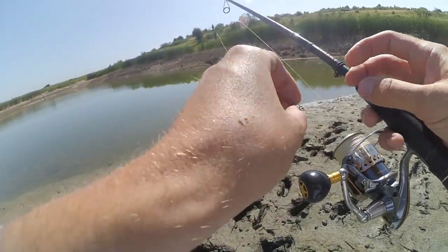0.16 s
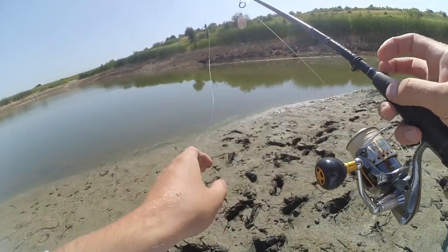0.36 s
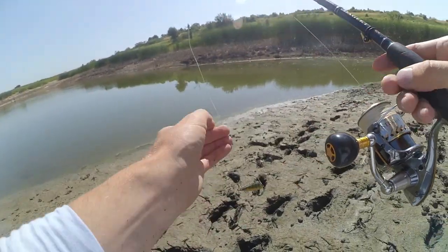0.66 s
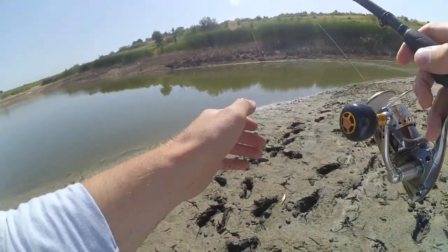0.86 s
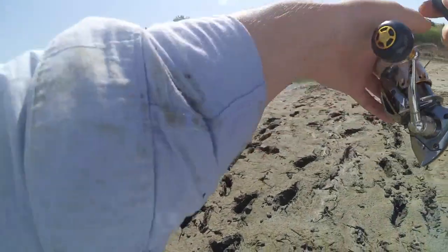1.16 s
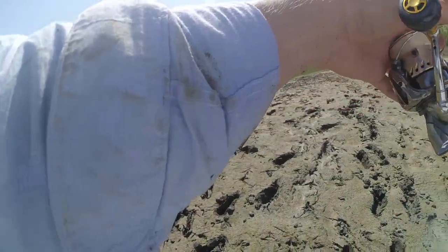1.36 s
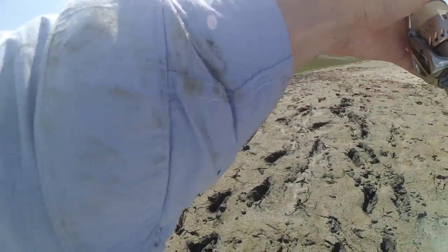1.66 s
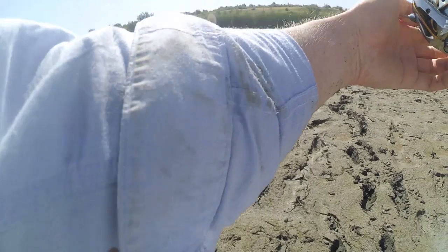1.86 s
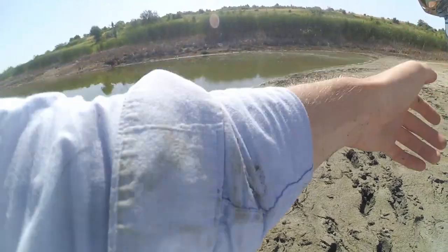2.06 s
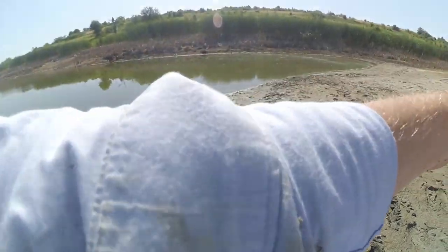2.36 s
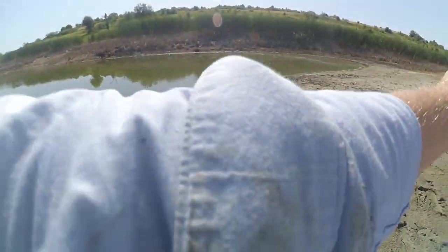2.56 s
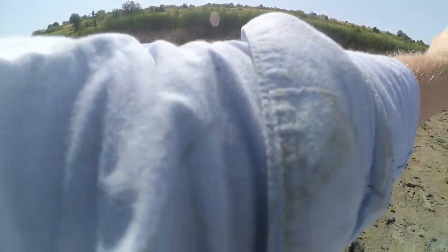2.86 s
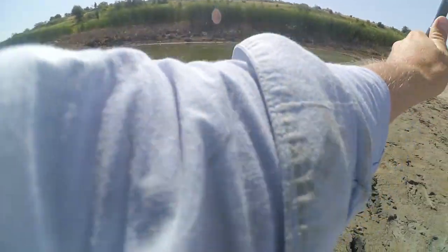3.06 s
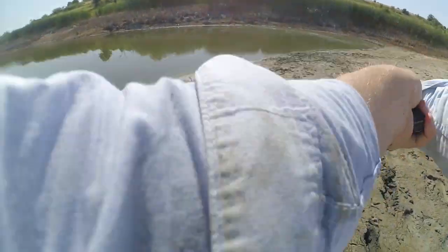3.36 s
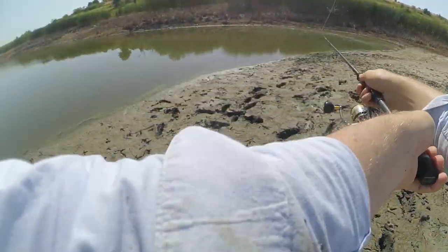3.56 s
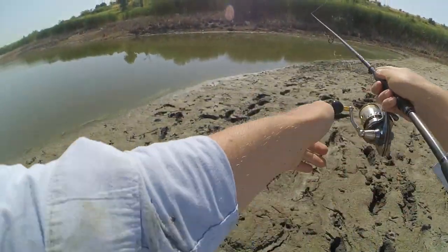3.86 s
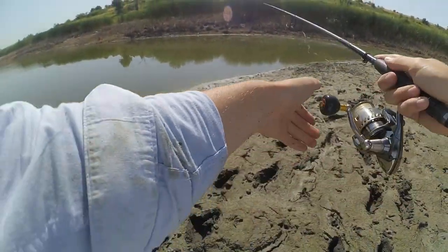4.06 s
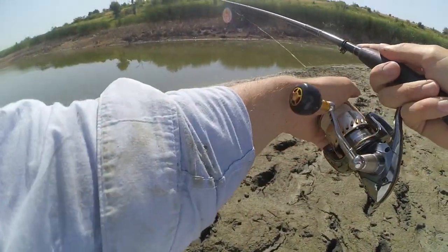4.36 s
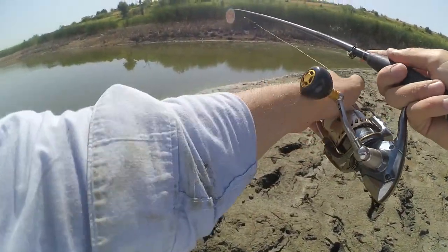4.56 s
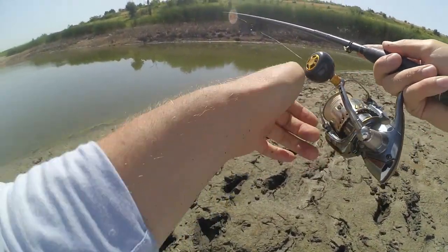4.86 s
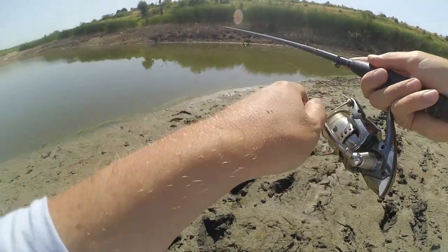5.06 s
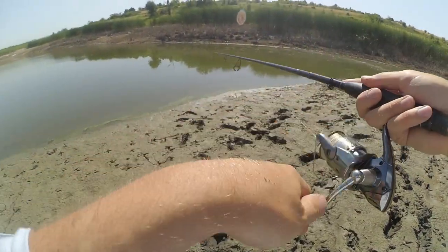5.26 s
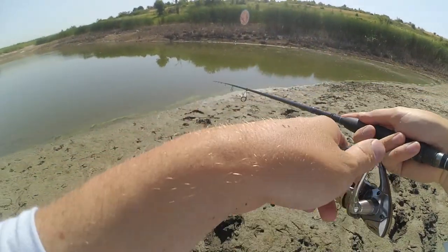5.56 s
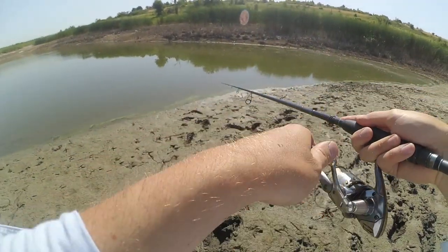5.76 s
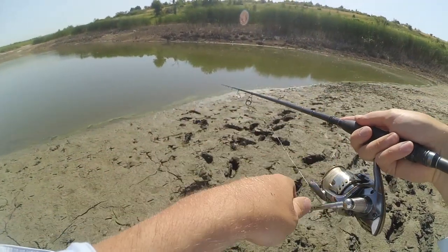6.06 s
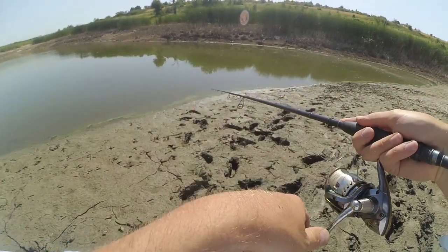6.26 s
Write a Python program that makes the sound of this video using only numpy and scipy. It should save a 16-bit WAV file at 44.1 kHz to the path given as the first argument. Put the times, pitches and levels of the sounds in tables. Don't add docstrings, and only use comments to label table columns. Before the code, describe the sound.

Outdoors by a quiet pond, an angler's shirt rustles and knocks against a sealed camera on the chest. Thin metal pings come as the reel wire opens, rubbing thickens, and a quick swish marks the cast. Cloth settles with dull taps; then the bail clacks shut with tiny bounces, and reel ticks continue over faint hiss.

```python
import sys
import numpy as np
from scipy import signal
from scipy.fft import rfft, irfft
from scipy.io import wavfile
from scipy.ndimage import uniform_filter1d

SR = 44100
rng = np.random.default_rng(int(sys.argv[2]) if len(sys.argv) > 2 else 0)


def transcribe(u):
    v = np.clip(np.atleast_2d(u).T, -1, 1)
    q = np.round(v * 32767).astype(np.int16)
    wavfile.write(sys.argv[1], SR, q)


def natural_amplitude(level_db):
    exponent = np.asarray(level_db, float) / 20
    return 10 ** exponent


N = 282856
TIME_S = np.arange(N) / SR

# frequency in Hz, density in dB per Hz.
HOUSING_RESPONSE = [(35, -24), (60, -4), (201, -3), (390, -10), (524, -5.5), (1040, -9), (1680, -27),
                    (2110, -15.5), (2840, -15.5), (3560, -26), (4900, -24.5), (5750, -34), (10200, -40),
                    (13100, -47.5), (14000, -53.5)]
# frequency in Hz, width in Hz, level in dB (unused).
SHELL_MODES = [(1039, 310, 0), (1520, 210, -8), (2140, 88, -2), (2846, 59, -6), (3310, 140, -10),
               (3870, 380, -13), (4400, 8.1, -14), (4920, 160, -13)]

# peak in seconds, rise in seconds, fall in seconds, level in dB, brightness in dB.
READYING_STROKES = [(.712, 0.095, 0.067, -55, -4.5), (.88, 0.19, 0.082, -65, -1.5),
                    (1.07, 0.14, 0.088, -58, -3.5), (1.18, 0.12, 0.13, -49, -4),
                    (1.29, 0.078, 0.085, -55.5, -4), (1.47, 0.16, 0.56, -58.5, -11.5),
                    (1.66, 0.51, .09, -56.5, -13), (1.84, 0.13, 0.15, -57.5, -3.5),
                    (2.07, 0.24, 0.12, -60.5, -4), (2.284, 0.067, 0.033, -61, -4.5),
                    (2.4, 0.13, 0.096, -60, -2.5), (2.51, 0.084, .07, -49.5, -4),
                    (2.57, 0.043, .07, -51.5, -3), (2.635, 0.085, .05, -48, -3),
                    (2.71, .07, 0.056, -50.5, -2.5), (2.79, .08, 0.13, -56.5, -3),
                    (2.88, 0.093, 0.75, -58, -1.5)]
# peak in seconds, rise in seconds, fall in seconds, level in dB, brightness in dB.
CASTING_STROKES = [
    (3.1, 0.21, 0.11, -53, -3),
    (3.186, 0.055, 0.068, -40.5, -5),
    (3.214, 0.045, 0.03, -34.5, -1.5),
    (3.29, 0.066, .06, -53, -13),
    (3.389, 0.16, 0.036, -50, -3),
    (3.481, 0.091, 0.42, -53.5, -6),
    (3.65, .2, 0.26, -60, -18),
    (3.82, 0.26, 0.15, -55.5, -5.5),
]
# peak in seconds, rise in seconds, fall in seconds, level in dB, brightness in dB.
REELING_STROKES = [
    (4.3, 0.49, 0.7, -72, -3.5),
    (4.87, 0.18, 0.2, -65, -4.5),
    (5.0, 0.21, 0.32, -62, -6),
    (5.29, 0.23, 0.11, -62, -11),
    (5.42, 0.18, .1, -70, -2),
    (5.75, 0.28, 0.15, -67, -11),
]
STROKE_DROP_DB, STROKE_SHAPE = 15.5, 1.19
REST_CAVITY_DB, REST_SHELL_DB, REST_HUM_DB, REST_LEAK_DB = -75, -78.5, -71.5, -82
HUM_DB, HUM_SLOPE, LEAK_DB, LEAK_SLOPE = -58.5, 1, -69, 0.83

# start in seconds, hum in dB, cavity over hum in dB.
CHEST_BUMPS = [(.485, -52.5, -1), (0.502, -40, -3), (0.962, -50.5, -3.5), (1.345, -46, -8),
               (1.401, -49, -9), (1.743, -42.5, -13), (1.796, -44.5, -6.5), (1.804, -51.5, 1),
               (1.895, -43.5, -9.5), (1.907, -49.5, -6), (2.061, -50, 0), (2.15, -48.5, -3),
               (2.896, -52, -6), (3.475, -43.5, -6), (3.826, -41.5, -7), (5.125, -43, -9),
               (5.95, -46, -10.5)]
# start in seconds, peak in dB, hardness in dB.
CREASE_SNAPS = [(.708, -44, -9), (.671, -57, 5), (.808, -53, 0), (1.145, -41, 3), (1.219, -41.5, -4),
                (1.287, -42.5, -0.5), (1.297, -43, -0.5), (1.7, -52, 4), (1.905, -58, -14), (2.016, -50, 5),
                (2.046, -37.5, -9), (2.061, -47, -6), (2.146, -53, -21), (2.224, -56.5, 9),
                (2.278, -48, -3), (2.349, -51, 2), (2.438, -43, -9), (2.493, -39, -3), (2.552, -56, -7),
                (2.595, -43, -4), (2.896, -53, 6), (2.972, -43.5, -7), (3.404, -42.5, -13),
                (3.649, -45.5, -7), (3.696, -49, -10), (3.741, -40.5, -10), (3.778, -52.5, 8.5),
                (4.999, -48, -4), (5.26, -51, -2), (5.754, -50.5, -8)]
JUDDER_START_S, JUDDER_PERIOD_S, JUDDER_COUNT = .7405, .0326, 6
JUDDER_DB, JUDDER_CAVITY_DB = -43, -9
BUMP_SHELL_DB, SNAP_HUM_DB = -13, -13
BUMP_THUD_DB, SNAP_THUD_DB = -1, -14
THUD_HZ, THUD_T60_S = 570, 0.025

# frequency in Hz, level in dB, t60 in seconds.
REEL_MODES = [(1560, 0, .011), (3600, -2, .007), (4500, -6, .006), (5500, -6, .006)]
# start in seconds, peak in dB, frame ring in dB, treble in dB, rattle length in seconds.
BAIL_HITS = [
    (4.582, -59, -64, -64, .0015),
    (4.614, -46, -58, -44, 0.00094),
    (4.6453, -52, -56, -58, 0.0015),
    (4.6475, -35.5, -45.5, -47.5, 0.0019),
    (4.654, -52, -70, -61, 0.00063),
    (4.661, -58, -64, -67, 0.0041),
    (4.671, -59, -70, -65, .0026),
    (4.742, -63, -71, -78, .002),
]
BAIL_HZ = 3700
# start in seconds, peak in dB.
WIRE_PINGS = [
    (1.8307, -47),
    (1.852, -48.5),
    (1.88, -53),
    (1.895, -55),
]
PING_HZ, PING_FRAME_DB, PING_TREBLE_DB, PING_RATTLE_S = 3450, -63, -8, .002
# start in seconds, peak in dB, ring in Hz, frame ring in dB.
REEL_TICKS = [(.432, -62, 3503, -76), (0.448, -62, 3100, -74), (.902, -52, 4900, -73),
              (1.682, -54, 2600, -74), (1.925, -54, 2060, -72), (4.084, -59, 2680, -70),
              (4.256, -49, 2240, -65), (4.267, -55, 2630, -77), (4.3122, -54, 2070, -77),
              (4.4518, -59, 2880, -64), (4.841, -56, 2960, -76), (4.996, -51, 4960, -66),
              (5.075, -54, 2140, -61), (5.102, -51, 2100, -51), (5.2609, -49.5, 2170, -61),
              (5.353, -58, 2860, -73), (5.4071, -55.5, 3920, -68), (5.749, -53, 2080, -68),
              (5.949, -56.5, 3900, -72)]
TICK_TREBLE_DB, TICK_RATTLE_S = -70, 0.0029
# start in seconds, peak in dB, ring in Hz, treble in dB, rattle length in seconds.
LINE_SLAPS = [
    (3.475, -41.5, 3700, -54.5, 0.00094),
]
SLAP_FRAME_DB = -70
# peak in seconds, rise in seconds, fall in seconds, level in dB, brightness in dB.
THUMB_SLIDES = [
    (4.47, .04, 0.11, -69.5, -5),
    (4.22, 0.055, 0.045, -78, -12),
]

# start in seconds, signed size, slow ring in Hz, t60 in seconds, knock in dB.
BODY_THUMPS = [(0.246, -0.011, 22, 0.87, -31.5), (0.487, -0.0065, 15.4, 1, -48),
               (.71, -0.017, 19, 0.2, -46), (0.807, 0.016, 25, 0.19, -32), (0.858, 0.0087, 36, 0.42, -53),
               (1.075, 0.015, 20, 0.26, -48), (1.494, -0.03, 21, 0.14, -55),
               (1.662, -0.024, 27, 0.15, -54.5), (2.041, -0.0095, 30, 0.4, -44),
               (2.27, -0.017, 25.6, 0.19, -48), (2.648, -0.0088, 25.7, 0.48, -58),
               (2.869, -0.011, 33, 0.15, -46.5), (3.186, 0.066, 14.4, 0.77, -30),
               (3.319, 0.03, 21.4, 0.34, -73), (3.385, -0.098, 16, 0.15, -40),
               (4.078, 0.011, 17, 0.12, -46), (4.155, -0.016, 88, 0.072, -50),
               (4.392, 0.009, 21.4, 0.53, -34.5), (4.846, 0.014, 15.4, 0.32, -47),
               (5.07, -0.018, 20.4, 0.12, -50), (5.0, 0.0091, 28, .3, -50),
               (5.586, -0.0104, 24.3, 0.63, -34), (5.812, 0.003, 30, 0.21, -45),
               (6.162, -0.0069, 24, 0.67, -33.5)]
# time in seconds, level in dB.
BODY_EFFORT = [(0.0, -54), (0.12, -68), (0.27, -55), (0.36, -67), (0.5, -50), (0.57, -66), (0.84, -44),
               (0.91, -55), (1.73, -50.5), (1.82, -55.5), (2.25, -54), (2.48, -61), (2.68, -54),
               (3.14, -67), (3.19, -39.5), (3.71, -57.5), (4.68, -57), (6.41, -62)]
SWAY_DB, SWAY_SLOPE, SWAY_WALK_DB, SWAY_TOP_DB, FLUTTER_DB = -48, 0.42, 6, -44, 1.5
# peak in seconds, rise in seconds, fall in seconds, level in dB, brightness in dB.
STRAP_STRAINS = [(.98, 0.068, 0.048, -61, 2), (1.25, 0.11, 0.15, -52.5, -10),
                 (1.4, 0.14, 0.12, -53.5, -9.5), (1.62, 0.15, 0.075, -64.5, 4),
                 (2.03, 0.075, 0.054, -56, -5), (2.15, 0.072, 0.096, -63, 3), (2.9, .06, .06, -55, -8.5),
                 (3.09, 0.093, 0.053, -58, -10), (3.2, 0.052, 0.053, -52.5, 0),
                 (3.5, 0.078, 0.1026, -54.5, -6), (3.8, .15, 0.11, -54.5, -3), (5.0, 0.22, .15, -58, -9),
                 (5.62, 0.052, 0.17, -61, -7)]

# frequency in Hz, width in Hz, level in dB.
CIRCUIT_MODES = [(2940, 340, 3), (4200, 200, 7), (6780, 470, -4)]
# start in seconds, length in seconds, level in dB.
CIRCUIT_CHIRRS = [
    (.095, 0.037, -75),
    (0.327, 0.025, -71),
    (4.122, .04, -75),
    (5.625, 0.051, -71.5),
    (5.928, .04, -73),
    (6.254, 0.043, -73.5),
]
BEAT_START_S, BEAT_PERIOD_S = .0415, .06
# frequency in Hz, density in dB per Hz.
HISS_SPECTRUM = [(35, -31.5), (60, -6), (277, -15), (356, -17), (993, -26), (1920, -29.5), (3560, -29),
                 (4370, -28), (6300, -36.5), (7060, -34.5), (7900, -34.5), (13100, -35), (14000, -41)]
HISS_DB = -72.5
CONVERTER_OFFSET = np.array([[-.00012], [.0005]])


def level(x, db=0):
    return x * natural_amplitude(db) / np.sqrt(np.mean(x ** 2))


def peak(x, db):
    return natural_amplitude(db) * x / np.abs(x).max()


def noise(count=N):
    return rng.standard_normal(count)


def band(x, lo_hz, hi_hz, order=4):
    sos = signal.butter(order, [lo_hz, min(hi_hz, .45 * SR)], "band", fs=SR, output="sos")
    return signal.sosfilt(sos, x)


def colour(x, points, peaks=(), lift_db=6, size=4096):
    f_hz = np.maximum(np.arange(size // 2 + 1) * SR / size, 1)
    points_hz, points_db = np.transpose(points)
    gain_db = np.interp(np.log(f_hz), np.log(points_hz), points_db)
    for hz, width_hz, _ in peaks:
        gain_db = gain_db + lift_db / (1 + (2 * (f_hz - hz) / width_hz) ** 2)
    cepstrum = irfft(gain_db * np.log(10) / 20)
    cepstrum[1:size // 2] *= 2
    cepstrum[size // 2 + 1:] = 0
    impulse = irfft(np.exp(rfft(cepstrum)))
    return signal.fftconvolve(x, impulse)[:len(x)]


def walk(rate_hz):
    hold = int(SR / rate_hz)
    steps = np.repeat(noise(N // hold + 1), hold)
    return 0.82 * uniform_filter1d(uniform_filter1d(steps, hold), hold)[:N]


def curves(table):
    s, *columns = np.transpose(table)
    return [np.interp(TIME_S, s, column) for column in columns]


def ring(t, hz, t60_s):
    return np.sin(2 * np.pi * hz * t) * np.exp(-np.log(1000) * t / t60_s)


def excite(force, mode):
    return signal.fftconvolve(force, mode)[:len(force)]


def add(out, s, sound):
    i = int(s * SR)
    out[i:i + len(sound)] += sound[:len(out) - i]


def strokes(table):
    plain, bright = 1e-12, 1e-12
    for s, rise_s, fall_s, db, bright_db in table:
        away = np.where(TIME_S < s, (s - TIME_S) / rise_s, (TIME_S - s) / fall_s)
        drop_db = np.minimum(STROKE_DROP_DB * away ** STROKE_SHAPE, 80)
        power = natural_amplitude(db - drop_db) ** 2
        plain = plain + power
        bright = bright + power * natural_amplitude(bright_db) ** 2
    return 10 * np.log10(plain), 10 * np.log10(bright)


def housing(force):
    x = colour(force, HOUSING_RESPONSE, SHELL_MODES + [(545, 99, 0)], lift_db=5)
    hum = band(x, 60, 267, order=2)
    cavity = band(x, 624, 1530)
    shell = band(x, 1520, 4550, order=3)
    leak = band(x, 6180, 20000, order=3)
    return hum, cavity, shell, leak


def cloth():
    sizes_db = np.minimum(4.9 * rng.exponential(size=N), 12)
    slips = (rng.random(N) < 1200 / SR) * noise() * natural_amplitude(sizes_db)
    flicker = natural_amplitude(0.19 * walk(45) + 2.8 * walk(140))
    force = flicker * (level(noise()) + level(slips, -2.2))
    hum, cavity, shell, leak = (level(part) for part in housing(force))
    plain_db, bright_db = strokes(READYING_STROKES + CASTING_STROKES + REELING_STROKES)
    hum_db = HUM_DB + HUM_SLOPE * (plain_db + 55)
    leak_db = LEAK_DB + LEAK_SLOPE * (bright_db + 55)
    regions = [(cavity, plain_db, REST_CAVITY_DB), (shell, bright_db, REST_SHELL_DB),
               (hum, hum_db, REST_HUM_DB), (leak, leak_db, REST_LEAK_DB)]
    out = np.zeros(N)
    for part, db, rest_db in regions:
        out += np.hypot(natural_amplitude(db), natural_amplitude(rest_db)) * natural_amplitude(0.96 * walk(25) - 1.5) * part
    return out


def taps():
    out, t = np.zeros(N), TIME_S[:2600]
    judder = [(JUDDER_START_S + k * JUDDER_PERIOD_S, JUDDER_DB, JUDDER_CAVITY_DB) for k in range(JUDDER_COUNT)]
    contacts = [(s, db + over_db, db + BUMP_SHELL_DB, db, BUMP_THUD_DB) for s, db, over_db in CHEST_BUMPS + judder]
    contacts += [(s, db, db + hard_db, db + SNAP_HUM_DB, SNAP_THUD_DB) for s, db, hard_db in CREASE_SNAPS]
    for s, cavity_db, shell_db, hum_db, thud_db in contacts:
        grit = noise(len(t))
        scuff = np.exp(-t / 0.00047) * (0.66 + grit)
        knock = (np.exp(-t / 0.00062) + 0.2 * np.exp(-t / 0.01)) * (0.52 + grit)
        push = signal.lfilter([1], [1, -np.exp(-1 / (0.00036 * SR))], knock)
        hum, cavity, _, _ = housing(push)
        shell = housing(scuff)[2]
        thud = band(excite(push, ring(t, THUD_HZ, THUD_T60_S)), 240, 900, order=1)
        add(out, s, peak(hum, hum_db + 0.5) + peak(thud, cavity_db + thud_db)
            + peak(cavity, cavity_db) + peak(shell, shell_db + 1.5))
    return out


def reel(table, t60_s, body, crack_hz):
    out, t = np.zeros(N), TIME_S[:1800]
    frame_hz, _, frame_t60_s = REEL_MODES[0]
    frame_mode = ring(t, frame_hz, 0.97 * frame_t60_s)
    body_modes = body * sum(natural_amplitude(db) * ring(t, hz, decay_s) for hz, db, decay_s in REEL_MODES[1:])
    for s, db, hz, frame_db, treble_db, length_s in table:
        decay = np.exp(-t / max(length_s, .0003))
        rattle = noise(len(t)) * decay * (1 - np.exp(-t / 0.00033))
        part = band(excite(rattle, ring(t, hz, t60_s) + body_modes), 2040, 4400, order=1)
        frame = band(excite(rattle, frame_mode), 1400, 1870, order=1)
        crack = band(rattle, *crack_hz, order=2)
        add(out, s, peak(part, db) + peak(frame, frame_db + 3.0) + peak(crack, treble_db + 7.0))
    return out


def metal():
    bail = [(s, db, BAIL_HZ, *rest) for s, db, *rest in BAIL_HITS]
    pings = [(s, db, PING_HZ, PING_FRAME_DB, db + PING_TREBLE_DB, PING_RATTLE_S) for s, db in WIRE_PINGS]
    ticks = [(*row, TICK_TREBLE_DB, TICK_RATTLE_S) for row in REEL_TICKS]
    ticks += [(s, db, hz, SLAP_FRAME_DB, treble_db, length_s) for s, db, hz, treble_db, length_s in LINE_SLAPS]
    out = reel(bail, 0.0082, 0.29, (4600, 11000))
    out += reel(pings, 0.011, 0.063, (5000, 13500))
    return out + reel(ticks, 0.0048, 0.12, (5000, 12000))


def thumb():
    drag = natural_amplitude(3.0 * walk(90)) * noise()
    frame_db, wire_db = strokes(THUMB_SLIDES)
    frame = level(band(drag, 1170, 1500, order=2))
    wire = level(band(drag, 3000, 4200, order=2))
    return natural_amplitude(frame_db) * frame + natural_amplitude(wire_db) * wire


def mount():
    effort_db, = curves(BODY_EFFORT)
    sway = level(band(noise(), 8.76, 23.4, order=2), -3.0)
    flutter = level(band(noise(), 27, 64.7, order=2), -5)
    sway_db = SWAY_DB + SWAY_SLOPE * (effort_db + 54.5) + SWAY_WALK_DB * walk(7.2)
    out = natural_amplitude(np.minimum(sway_db, SWAY_TOP_DB)) * sway + natural_amplitude(effort_db + FLUTTER_DB) * flutter
    t = TIME_S[:SR // 2]
    soft = 1 - np.exp(-t / 0.0095)
    for s, size, hz, t60_s, knock_db in BODY_THUMPS:
        slow = 1.51 * size * ring(t, hz, t60_s)
        knock = np.sign(size) * natural_amplitude(knock_db) * ring(t, 44.5, 0.12)
        add(out, s, soft * (slow + knock))
    return out


def strap():
    slips = natural_amplitude(1.9 * walk(40)) * noise()
    low_db, high_db = strokes(STRAP_STRAINS)
    low = level(band(slips, 55, 124, order=2))
    high = level(band(slips, 128, 235, order=4))
    return natural_amplitude(low_db) * low + natural_amplitude(high_db) * high


def circuit():
    source = noise()
    tones = [level(band(source, hz - width_hz / 2, hz + width_hz / 2, order=1), db)
             for hz, width_hz, db in CIRCUIT_MODES]
    since_beat_s = (TIME_S - BEAT_START_S) % BEAT_PERIOD_S
    beat = np.exp(-since_beat_s / 0.0019) * natural_amplitude(0.57 * walk(4.3))
    tick = beat * (level(band(source, 2500, 6200, order=1), -66) + level(tones[2], -72.5))
    gate = np.zeros(N)
    for s, length_s, db in CIRCUIT_CHIRRS:
        add(gate, s, natural_amplitude(db) * signal.windows.tukey(int(length_s * SR), .4))
    return tick + gate * level(sum(tones))


def hiss():
    x = band(colour(noise(), HISS_SPECTRUM), 38, 18100, order=6)
    x = x * natural_amplitude(HISS_DB + 1.0) / np.std(band(x, 230, 13000))
    whine = natural_amplitude(2.4 * walk(4.7)) * level(band(noise(), 6900, 7200, order=2), -85.5)
    return natural_amplitude(1.0 * walk(1.7)) * x + whine


def scene():
    steady = cloth() + taps() + mount() + strap() + circuit() + hiss()
    steady = signal.sosfilt(signal.ellip(10, .2, 60, 13600, fs=SR, output="sos"), steady)
    mono = steady + metal() + thumb()
    side = level(band(noise(), 4200, 9500, order=1), -96.5)
    side += level(band(noise(), 15, 72, order=2), -89)
    return np.array([mono + side, mono - side])


def low_pass(x):
    return signal.sosfilt(signal.butter(12, 14200, fs=SR, output="sos"), x)


def record(dry):
    return low_pass(dry + CONVERTER_OFFSET)


dry = scene()
out = record(dry)
transcribe(out)
```